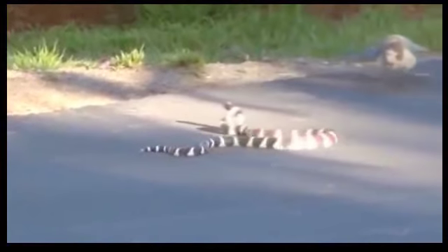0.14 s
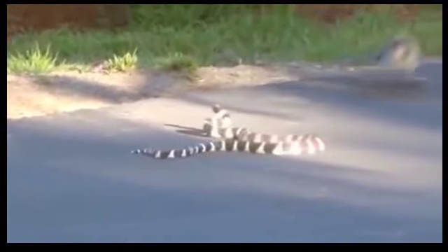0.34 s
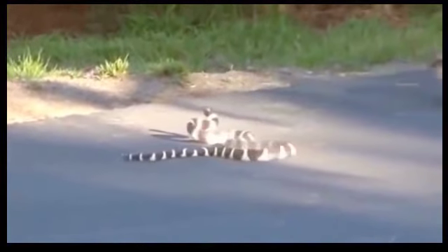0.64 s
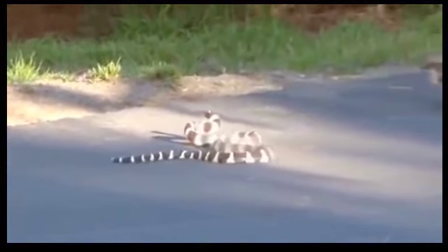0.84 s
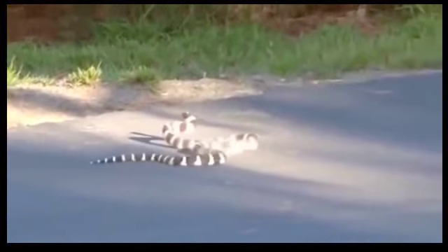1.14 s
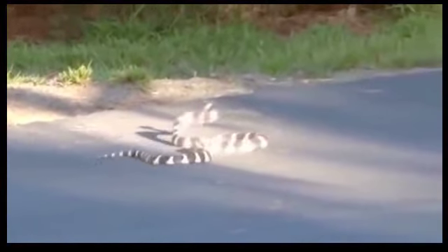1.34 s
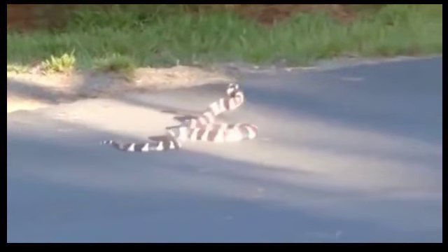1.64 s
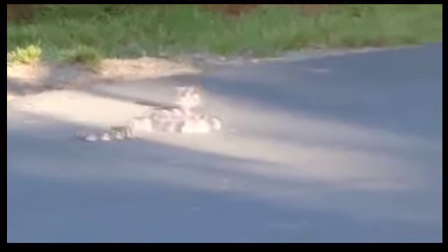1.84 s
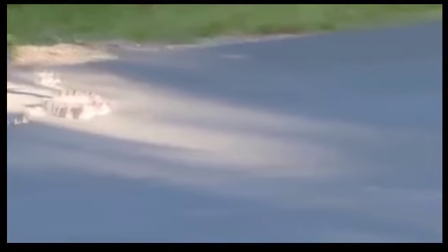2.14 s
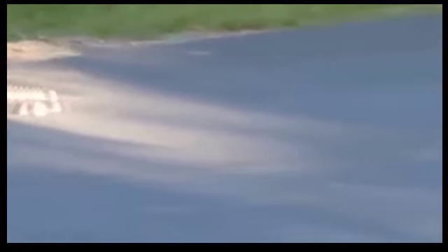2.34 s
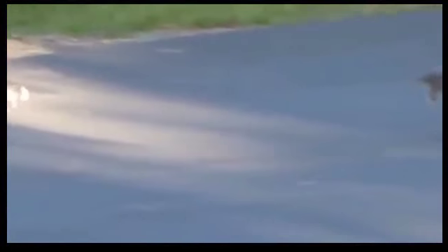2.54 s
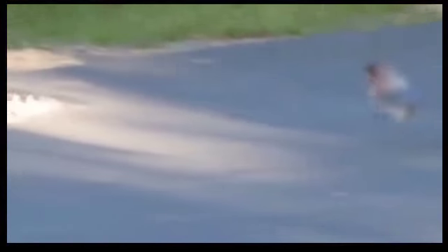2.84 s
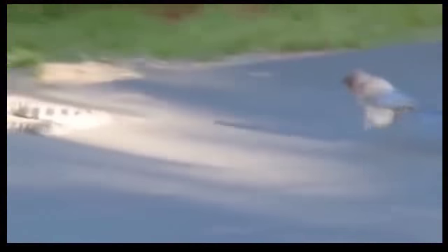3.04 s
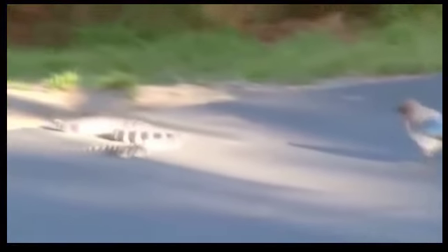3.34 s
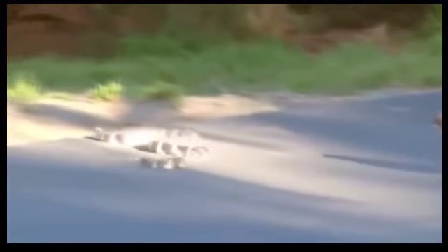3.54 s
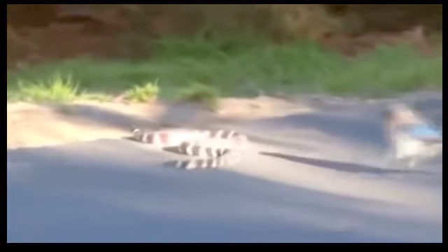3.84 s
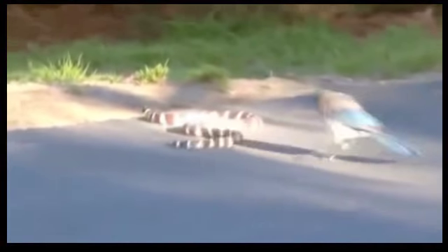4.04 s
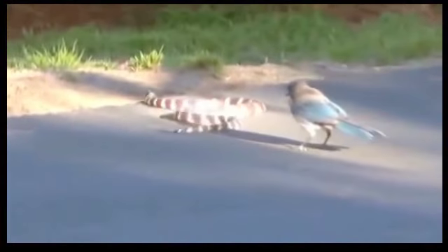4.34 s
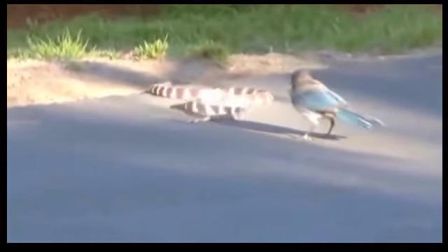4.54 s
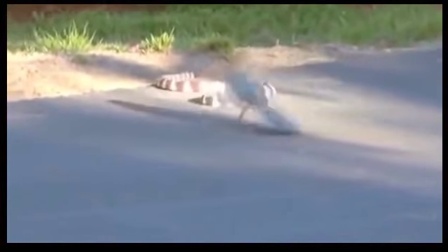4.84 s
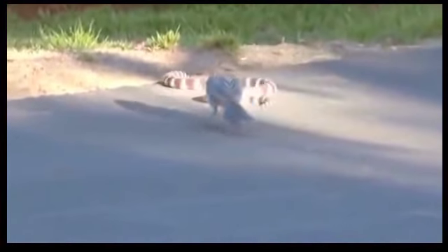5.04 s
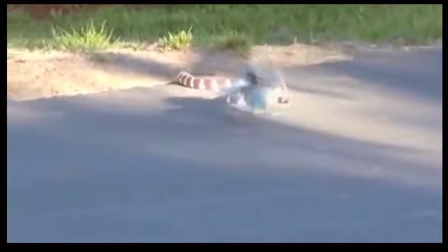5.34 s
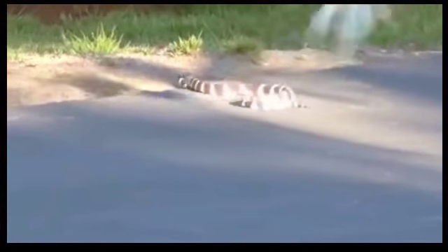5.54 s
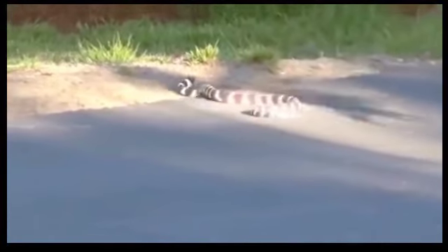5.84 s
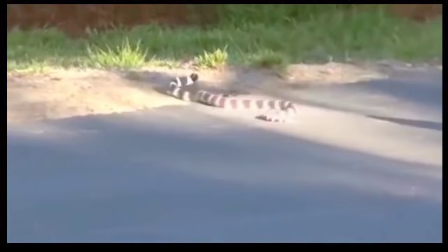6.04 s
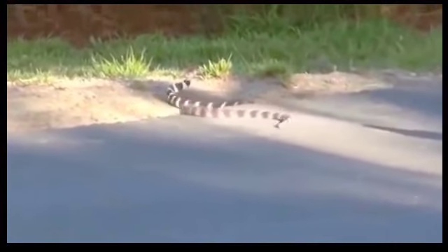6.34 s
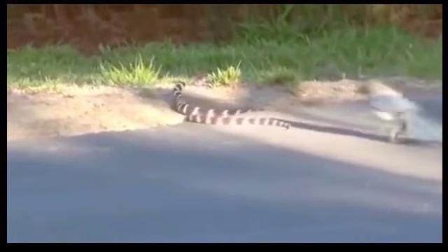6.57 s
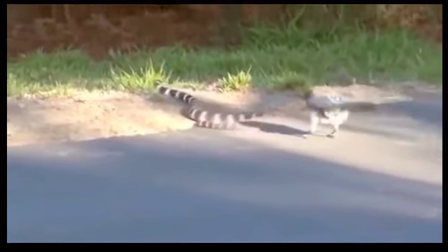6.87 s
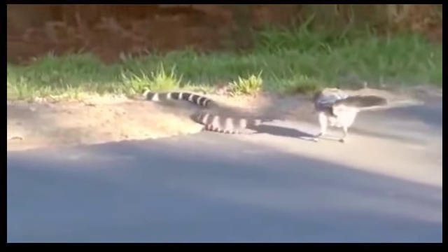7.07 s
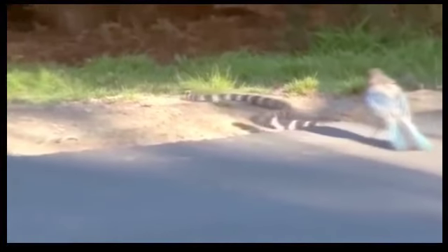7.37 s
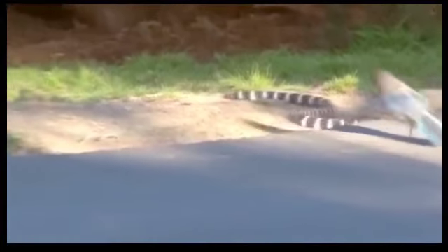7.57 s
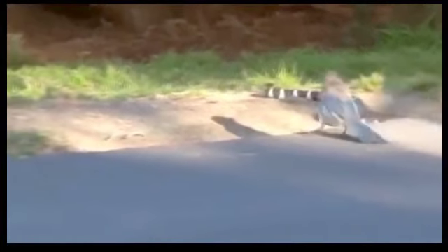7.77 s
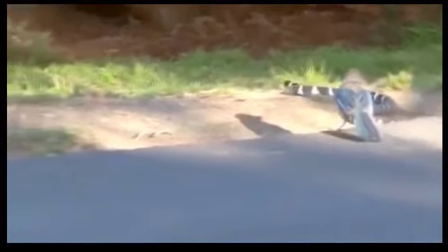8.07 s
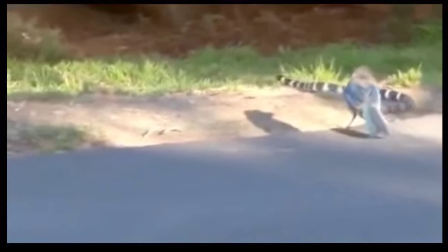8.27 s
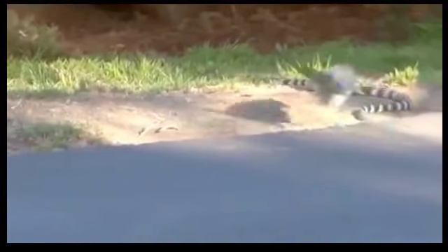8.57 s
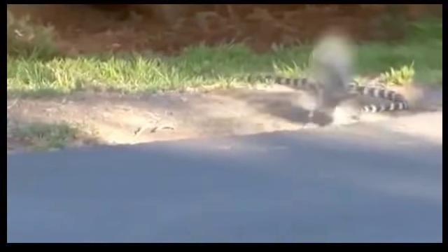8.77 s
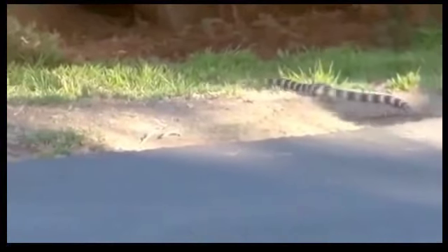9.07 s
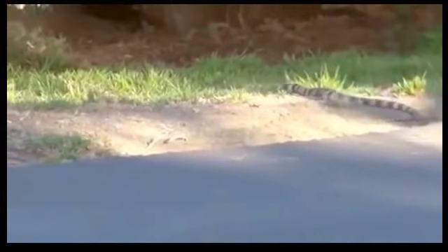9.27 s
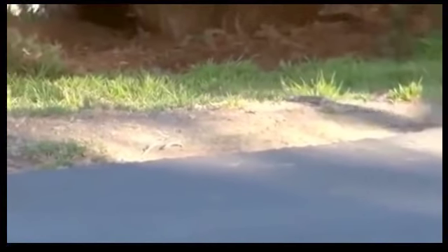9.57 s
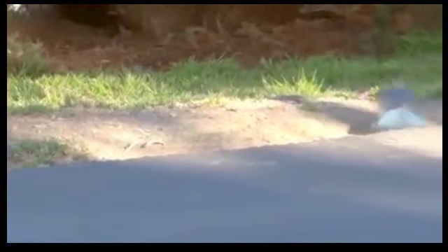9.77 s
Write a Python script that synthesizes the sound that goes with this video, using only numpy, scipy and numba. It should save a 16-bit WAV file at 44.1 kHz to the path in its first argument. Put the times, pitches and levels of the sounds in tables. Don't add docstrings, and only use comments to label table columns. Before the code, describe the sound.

A jay gives short hoarse rising scolds, spaced out over a quiet lane, while loud mechanical latch snaps crack close to the microphone.

```python
import sys
import numpy as np
from scipy import signal
from scipy.fft import rfft, irfft
from scipy.io import wavfile
from scipy.ndimage import uniform_filter1d
from numba import njit

SR = 44100
rng = np.random.default_rng(int(sys.argv[2]) if len(sys.argv) > 2 else 0)


def persist_wave(psi):
    counts = np.round(np.clip(psi, -1, 1) * 32767).astype(np.int16)
    wavfile.write(sys.argv[1], SR, np.atleast_2d(counts).T)


def volts_from_decibels(level):
    exponent = np.asarray(level, float) / 20
    return 10 ** exponent


N = 437031
TIME = np.arange(N) / SR


def unit(x):
    return x / np.sqrt(np.mean(x ** 2))


def ring(x, hz, width_hz):
    return signal.lfilter(*signal.iirpeak(hz, hz / width_hz, SR), x)


def lowpass(x, order, hz):
    return signal.sosfilt(signal.butter(order, hz, fs=SR, output="sos"), x)


def highpass(x, order, hz):
    return signal.sosfilt(signal.butter(order, hz, "high", fs=SR, output="sos"), x)


def noise_band(shape, hz, width_hz):
    return unit(ring(ring(rng.standard_normal(shape), hz, width_hz), hz, width_hz))


def wobble(rate_hz):
    return unit(lowpass(rng.standard_normal(N), 2, rate_hz))


def pan(x, db):
    return x * volts_from_decibels(np.array([db / 2, -db / 2]).reshape(2, -1))


# creak_start_s, creak_rate_hz, warble_start_s, warble_rate_hz
CALL = [
    (-.21, 104, -.008, 67),
    (.8045, 101, .999, 71),
    (2.5135, 107, 2.722, 85),
    (3.4045, 104, 3.605, 77),
    (4.584, 104, 4.786, 77),
    (6.189, 104, 6.391, 79),
    (7.5705, 104, 7.786, 77),
    (9.555, 101, 9.763, 77),
]
# brightness_db, breath_db, left_minus_right_db, creak_depth (0-1), first_puff_db (re hold)
FACING = [(-2, 5, -7, .9, -14), (2, 1, -7, 0.7, -14), (4, 0, -5.5, 0.8, -17), (0, -0.5, -5.5, 0.7, -13),
          (-2.5, -2, -5, 0.6, -18), (-3, 1.5, -6.5, 0.5, -16), (-3, -1, -6, 0.7, -8),
          (-2.5, -1.5, -6.5, .8, -17)]
# after_start_s, breath_noise_db, brightness_db
TIMBRE = [(0, -13, -2.5), (.02, -16, 1), (.065, -9, 4.5), (.125, -5.5, -2.5), (.17, -12, 2),
          (.245, -17.5, 1), (.3, -13, -1)]
# beak_shut_hz, beak_open_hz, width_hz, shut_db, open_db
THROAT = [(2250, 2510, 1970, 4.5, -13), (3715, 4100, 1030, 1, 9), (4520, 4900, 2800, -5.5, -7),
          (6400, 6320, 1500, -21, -4), (12800, 12800, 2500, -42, -28)]
# beak_shut_hz, beak_open_hz, width_hz, shut_db, open_db
BREATH = [(4300, 3570, 3600, -1.5, -2.7), (7000, 6540, 4500, -2.3, -0.7)]
# centre_hz, width_hz
SMEAR = [(2300, 680), (3700, 640), (5200, 3600)]
FUNDAMENTAL_DB, GRAIN_DB, THIN_HISS_DB = -25, 1.2, -37


def jay():
    singing = sum((TIME > row[0]) & (TIME < row[0] + level[4]) for row, level in zip(CALL, EFFORT))
    sounding = uniform_filter1d(1. * singing, size=480)
    on = sounding > 1e-6
    t = TIME[on]
    call = np.searchsorted(np.array(CALL)[1:, 0] - .05, t)
    start, creak_hz, bend, warble_hz = np.array(CALL)[call].T
    bright_db, breath_db, side_db, creak, attack_db = np.array(FACING)[call].T
    after, breathy_db, shine_db = np.transpose(TIMBRE)
    breath_db = breath_db + np.interp(t - start, after, breathy_db)
    bright_db = bright_db + np.interp(t - start, after, shine_db)
    way = (t - start) / (bend - start)
    beak = np.clip(way / 1.15, 0, 1) ** 1.8

    closing = np.clip(1.6 - (t - start) / .025, 0, 1)
    puff = ((t - start) * creak_hz) % 1
    chop = 1 - np.clip(creak, 0, 1) * closing * (1 - 9 * puff * np.exp(-(puff / 0.37) ** 2))
    source, phase, rasp = syrinx(t, on, way, puff, bend, warble_hz)

    tone = throat(source, beak, THROAT[:1]) - volts_from_decibels(bright_db) * throat(source, beak, THROAT[1:])
    tone = highpass(tone, 5, 1650)
    for smear_hz, width_hz in SMEAR:
        tone = tone - 2 * ring(tone, smear_hz, width_hz)
    tone = tone / np.sqrt(uniform_filter1d(tone ** 2, size=1500))
    tone = tone + volts_from_decibels(FUNDAMENTAL_DB) * beak * rasp * np.cos(phase)
    hiss = unit(throat(rng.standard_normal(N)[on], beak, BREATH))
    voice = tone + volts_from_decibels(breath_db + GRAIN_DB * wobble(120)[on]) * hiss

    voice = lowpass(voice, 5, 8400)
    thin = noise_band(len(t), 13000, 4000)
    level = sounding[on] * chop * volts_from_decibels(effort(t, call, start, attack_db))
    out = np.zeros((2, N))
    out[:, on] = pan(level * (voice + volts_from_decibels(THIN_HISS_DB) * thin), side_db)
    return out


# way_from_creak_to_warble (share), pitch (share of PITCH_HZ)
GLIDE = [(0, .38), (.2, .615), (.3, .685), (.7, .92), (.97, .98), (1.03, 1.07), (1.2, 1.12), (1.32, 1.17),
         (1.5, 1.175)]
# pitch_hz, pitch_scatter (share)
HOARSE = [(500, .03), (780, .035), (900, .06), (1000, .055), (1130, .028), (1280, .02), (1520, .022)]
PITCH_HZ = 1286.6
FLUTTER_PITCH, FLUTTER_LEVEL = .03, .3


def syrinx(t, on, way, puff, bend, warble_hz):
    glide = PITCH_HZ * np.interp(way, *np.transpose(GLIDE))
    scatter = np.interp(glide, *np.transpose(HOARSE))
    flutter = np.cos(2 * np.pi * puff + 0.84 * wobble(25.4)[on]) * np.clip(1 - way, 0, 1) ** .5
    shake = scatter * (.7 * wobble(450) + .6 * wobble(70))[on] + FLUTTER_PITCH * flutter
    since = t - bend
    warble = .25 * np.clip(since / .003, 0, 1) * np.clip(2.6 - since / .027, 0, 1)
    arch = np.abs(np.sin(np.pi * warble_hz * since)) - 2 / np.pi
    hz = glide * (1 + warble * uniform_filter1d(arch, size=90) + shake)
    phase = 2 * np.pi * np.cumsum(hz) / SR
    sharp = np.exp(-hz / 5000)
    pulses = (1 - sharp ** 2) / (1 + sharp ** 2 - 2 * sharp * np.cos(phase)) - 1
    strong_weak = 1 + 5 * scatter * np.cos(phase / 2)
    rasp = 1 + .25 * wobble(300)[on] + FLUTTER_LEVEL * flutter
    return pulses * strong_weak * rasp, phase, rasp


@njit
def glide_ring(x, hz, width_hz):
    y = np.empty(len(x))
    band, low = 0., 0.
    for i in range(len(x)):
        g = np.tan(np.pi * hz[i] / SR)
        k = width_hz[i] / hz[i]
        v = (band + g * (x[i] - low)) / (1 + g * (g + k))
        band = 2 * v - band
        low = low + 2 * g * v
        y[i] = k * v
    return y


def throat(x, beak, modes):
    out = 0
    for k, (shut_hz, open_hz, width_hz, shut_db, open_db) in enumerate(modes):
        hz = shut_hz + beak * (open_hz - shut_hz)
        wide = width_hz * (0.67 + 0.53 * beak)
        gain = (-1) ** k * volts_from_decibels(shut_db + beak * (open_db - shut_db))
        out = out + gain * glide_ring(glide_ring(x, hz, wide), hz, wide)
    return out


# held_level_db, peak_level_db, peak_after_start_s, last_level_db, length_s
EFFORT = [(-6, -29.5, 0.24, -39, .295), (-36.5, -29, 0.23, -36.5, .281), (-33, -30.5, 0.243, -37, .277),
          (-39.5, -34, 0.23, -41, .298), (-39, -38.5, 0.26, -43, .306), (-41, -33.5, .19, -44, .281),
          (-39, -37.5, 0.22, -45.5, .3), (-38.5, -36, 0.23, -57.5, 0.34)]
ATTACK_S, SWELL_FROM_S = .014, 0.1


def effort(t, call, start, attack_db):
    hold_db, peak_db, peak_s, last_db, length = np.array(EFFORT)[call].T
    since = np.maximum(t - start, 0)
    swell = np.clip((since - SWELL_FROM_S) / (peak_s - SWELL_FROM_S), 0, 1)
    fade = np.clip((since - peak_s) / (length - peak_s), 0, 1)
    attack = attack_db * np.exp(-since / ATTACK_S)
    return attack + hold_db + swell * (peak_db - hold_db) + fade * (last_db - peak_db)


def body(x, modes):
    return sum((-1) ** k * volts_from_decibels(db) * ring(x, hz, w) for k, (hz, w, db) in enumerate(modes))


# strike_s, peak_db, left_minus_right_db, upper_body_db, treble_db
SNAPS = [
    (0.353, -5, 7, -21.5, -27.5),
    (4.492, -29.5, -0.5, -3.5, -13),
    (4.674, -2.5, 4, -10, -24.5),
    (9.372, -45, 16, -11, -37),
    (9.383, -39, -2, -6, -12),
    (9.394, -30, 1, -6.5, -19.5),
    (9.805, -3.5, 4.5, -15.5, -39),
]
# low_modes_db, middle_mode_db, high_mode_db, rebound_ms, rebound_strength
SNAP_SPOT = [(4, 3, 4, 1.144, 1.1), (10, 5.5, 3, 1.3, 0.48), (3.5, 0.5, 3, 1.6, 1.09),
             (20, -2, -8, 0.98, .6), (-1, 2, 1, 1.15, .9), (9, -3, 0, 1.42, .6), (-0.5, -1, 5, .77, 1.12)]
SNAP_STRIKES = [(0, 1, 1), (0.998, 0.76, 0.76), (2.202, 0.24, 0.42), (3.3, 0.16, 0.24)]
# centre_hz, width_hz, level_db
SNAP_BODY = [(470, 90, -19), (1075, 193, -7), (2050, 325, 3), (2800, 282, 1.5)]
# centre_hz, width_hz, level_db
SNAP_UPPER = [(3710, 1010, 1.5), (4145, 680, 3.5)]
# centre_hz, width_hz, level_db
SNAP_TREBLE = [(5260, 860, 5), (6900, 2800, 4.5), (11500, 410, 4)]
# pitch_hz, level_db, t60_s
SNAP_RING = [(844, -6.5, 0.1), (1670, -24, 0.11), (1690, 6, 0.06), (2070, -21, 0.091), (2246, -19, 0.23)]
LEAD_S, LEAD_DB = 0.0013, -34


def snaps():
    size = 6000
    out = np.zeros((2, N + size))
    t = np.arange(size) / SR - .004
    rattle = np.clip(t / .0005, 0, 1) * (volts_from_decibels(-33) * np.exp(-(t / .004) ** 2) + volts_from_decibels(-35) * np.exp(-t / .008))
    slide = volts_from_decibels(LEAD_DB) * np.exp(-np.abs(t) / LEAD_S)
    hum = sum(volts_from_decibels(db - 28.0) * np.sin(2 * np.pi * hz * t) * volts_from_decibels(-60 * t / t60) for hz, db, t60 in SNAP_RING)
    hum = hum * np.clip(t / 0.0011, 0, 1)
    for snap, spot in zip(SNAPS, SNAP_SPOT):
        s, peak_db, side_db, upper_db, treble_db = snap
        low, mid, high, rebound_ms, again = spot
        blow = rng.standard_normal((2, size)) * (rattle + slide)
        for k, left, right in SNAP_STRIKES:
            click = np.sinc((t - .0004 - k * rebound_ms / 1000) * SR / 0.99) / 3
            blow = blow + np.array([[left], [right]]) * again ** k * click
        struck = [(hz, w, db + more) for (hz, w, db), more in zip(SNAP_BODY, (low, low, mid, high))]
        hit = body(blow, struck)
        hit = hit + volts_from_decibels(upper_db + 6) * body(blow, SNAP_UPPER)
        hit = hit + volts_from_decibels(treble_db + 2.5) * body(blow, SNAP_TREBLE)
        hit = hit / np.abs(hit.mean(axis=0)).max()
        i = int((s + t[0]) * SR)
        out[:, i:i + size] += pan((hit + hum) * volts_from_decibels(peak_db), side_db)
    return highpass(lowpass(out, 8, 11800)[:, :N], 2, 250)


# start_s, peak_db, pitch_hz, left_minus_right_db
KNOCKS = [
    (4.538, -67, 75.4, -10),
    (4.568, -57, 72.7, -15),
    (5.009, -62, 62.4, -18),
    (5.118, -39.5, 235, -9),
]


def knocks():
    out = np.zeros((2, N))
    for s, db, hz, side_db in KNOCKS:
        t = TIME - s - .004
        thud = np.sin(2 * np.pi * hz * t) + 0.59 * np.sin(3.4 * np.pi * hz * t)
        out += pan(volts_from_decibels(db) * thud * np.exp(-(t * hz / 0.79) ** 2), side_db)
    return out


HEDGE_T60_S = 0.37


def hedges(x):
    t = np.arange(int(.6 * SR)) / SR
    echo = rng.standard_normal((2, len(t))) * np.clip(t / 0.0035, 0, 1) * volts_from_decibels(-60 * t / HEDGE_T60_S)
    echo = lowpass(echo, 1, 7500)
    return signal.fftconvolve(x[None], echo / np.sqrt(np.sum(echo ** 2) / 2), axes=1)[:, :N]


RUSTLE_S, RUSTLE_HOLD_S, RUSTLE_EDGE_S, RUSTLE_DB = 8.105, .075, 0.039, -65


def rustle():
    hiss = noise_band((2, N), 6900, 2200) * volts_from_decibels(3.4 * wobble(60))
    since = TIME - RUSTLE_S
    inside = np.minimum(since, RUSTLE_HOLD_S - since)
    return hiss * volts_from_decibels(RUSTLE_DB) * np.clip(inside / RUSTLE_EDGE_S + 1, 0, 1) ** 2


# peak_s, peak_db, fall_db_per_s
GUSTS = [(1.43, -66, 41), (2.75, -73, 20), (3.45, -52, 43), (4.06, -60, 34), (4.55, -52, 52),
         (4.96, -78, 60), (5.13, -51, 114), (5.49, -59, 94), (6.12, -58.5, 50), (7.92, -69, 60),
         (8.61, -71, 50), (9.6, -61, 150)]
GUST_RISE_DB_PER_S, BREEZE_DB = 189, -76


def wind():
    rumble = noise_band((2, N), 87, 113)
    gusts = volts_from_decibels(BREEZE_DB)
    for s, db, fall in GUSTS:
        gusts = gusts + volts_from_decibels(db - np.maximum(GUST_RISE_DB_PER_S * (s - TIME), fall * (TIME - s)))
    return pan(rumble * gusts * volts_from_decibels(-12 + 3.5 * wobble(24.0)), -13.5)


def shade(points):
    hz, db = np.transpose(points)
    return np.interp(np.log(np.fft.rfftfreq(N, 1 / SR) + 1), np.log(hz), db)


# frequency_hz, level_db (per Hz)
FAR = [(15, -51), (25, -19), (75, -25), (125, -11.5), (151, -14), (418, -3), (795, -0.5), (1040, -3),
       (1360, -5), (1560, -5), (9900, -21), (14000, -33.5), (15200, -13)]
# frequency_hz, left_minus_right_db
FAR_SIDE = [(60, -13), (110, -8.5), (200, -12.5), (380, -5), (690, -5.5), (1280, 4.5), (2350, 4),
            (4340, 5.5), (8000, 3), (14800, -11.5)]
# time_s, level_db
FAR_LEVEL = [(0.0, -57), (0.6, -61.5), (1.07, -60), (2.15, -60.5), (7.6, -62), (8.2, -61), (9.1, -62.5),
             (9.91, -61)]
FAR_SWELL_DB, FAR_SWELL_HZ = .4, 8


def far():
    shared = lowpass(rng.standard_normal(N), 1, 4000)
    noise = rng.standard_normal((2, N)) + 0.66 * shared
    lean = np.array([[.5], [-.5]]) * shade(FAR_SIDE)
    hum = unit(irfft(rfft(noise) * volts_from_decibels(shade(FAR) + lean), N))
    level_db = np.interp(TIME, *np.transpose(FAR_LEVEL)) + 8.0
    return hum * volts_from_decibels(level_db + FAR_SWELL_DB * wobble(FAR_SWELL_HZ))


def scene():
    bird, snap = jay(), snaps()
    wet = hedges(volts_from_decibels(-6.5) * bird.mean(axis=0) + volts_from_decibels(-37.0) * snap.mean(axis=0))
    return bird + snap + wet + knocks() + rustle() + wind() + far()


def low_pass(x):
    return signal.sosfilt(signal.butter(12, 14990, fs=SR, output="sos"), x)


def record(dry):
    rounded = dry / (1 + (dry / .95) ** 8) ** (1 / 8)
    mix = signal.sosfilt(signal.ellip(8, .2, 60, 14500, fs=SR, output="sos"), rounded)
    return low_pass(mix)


dry = scene()
out = record(dry)
persist_wave(out)
```